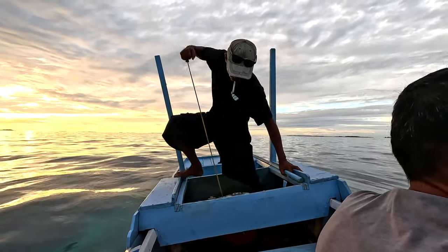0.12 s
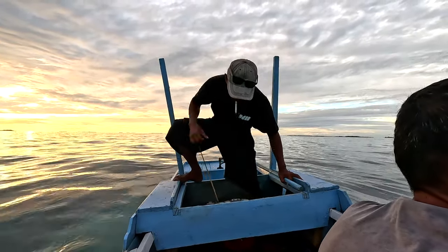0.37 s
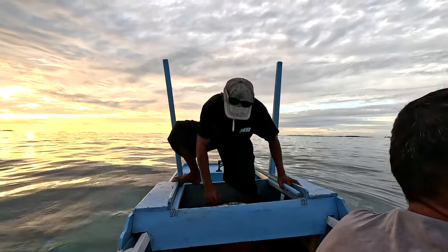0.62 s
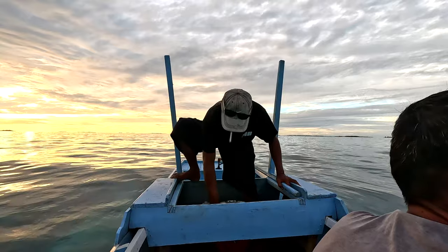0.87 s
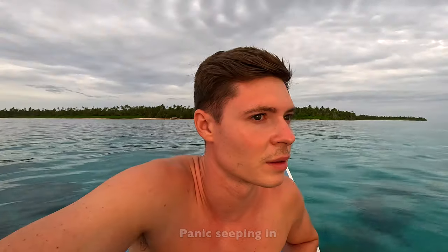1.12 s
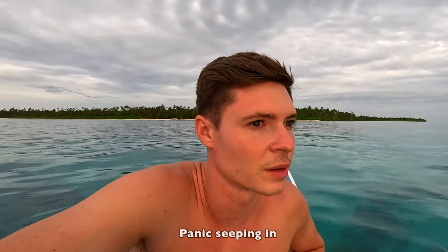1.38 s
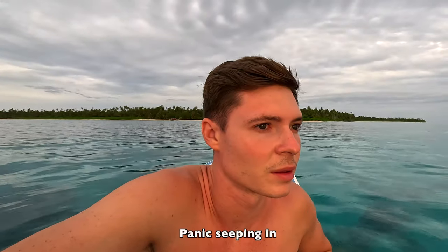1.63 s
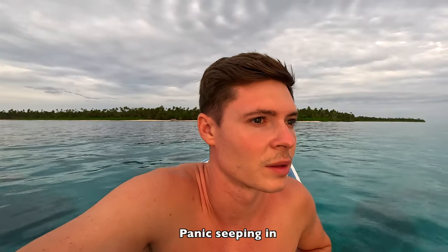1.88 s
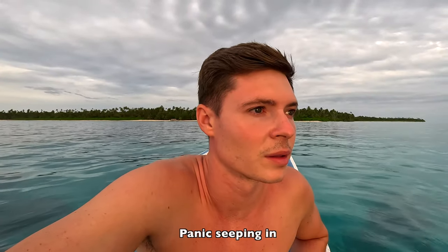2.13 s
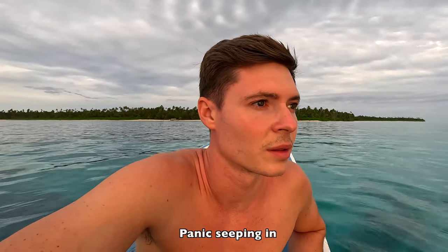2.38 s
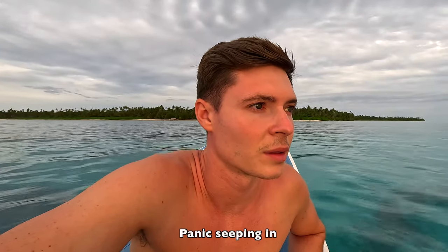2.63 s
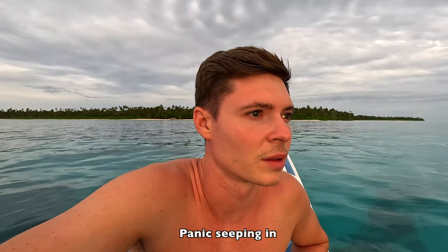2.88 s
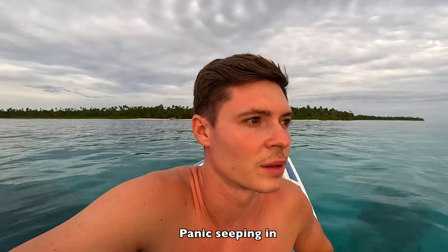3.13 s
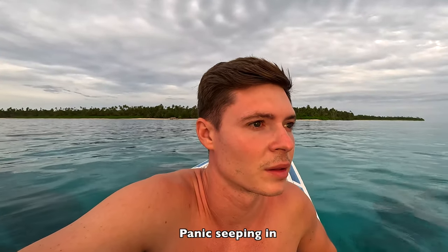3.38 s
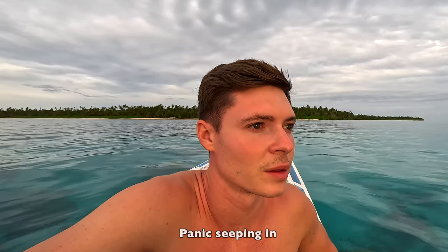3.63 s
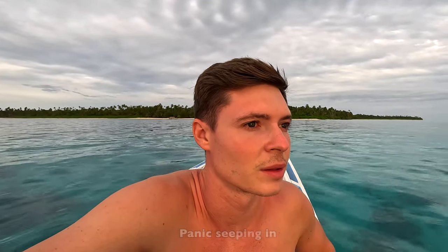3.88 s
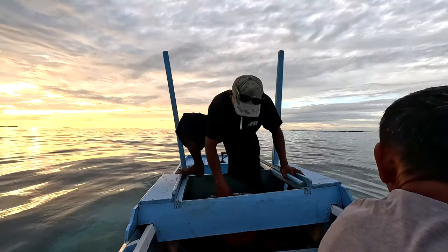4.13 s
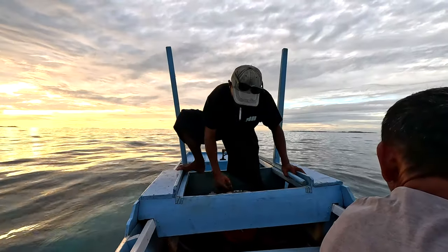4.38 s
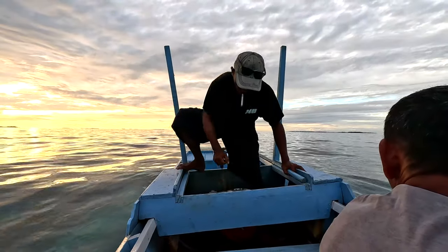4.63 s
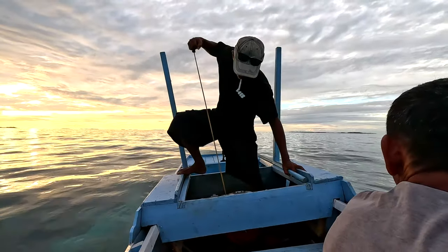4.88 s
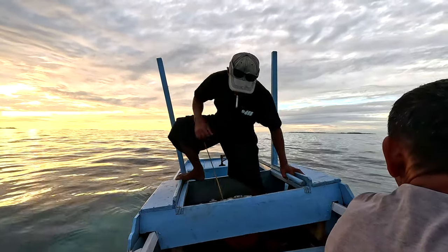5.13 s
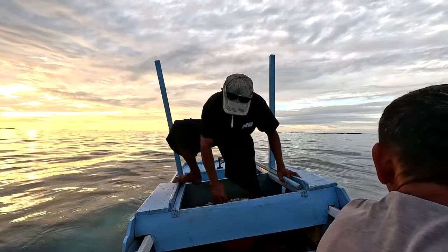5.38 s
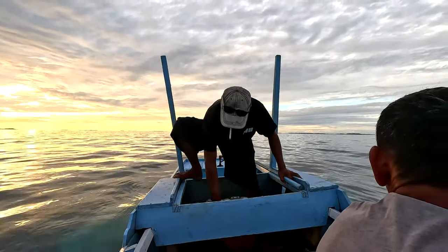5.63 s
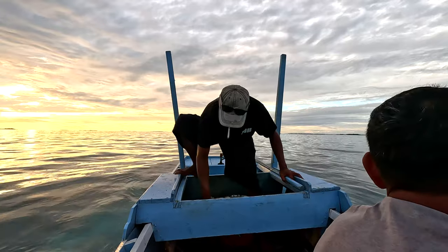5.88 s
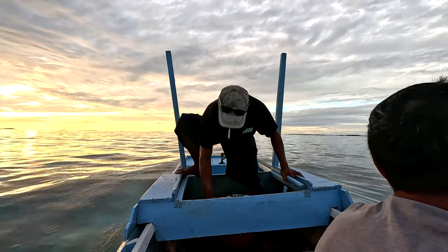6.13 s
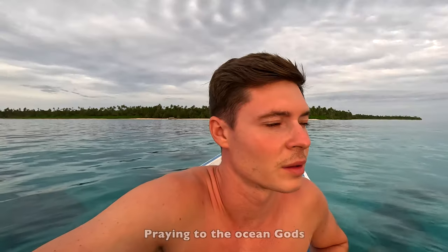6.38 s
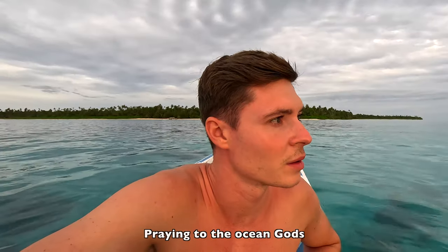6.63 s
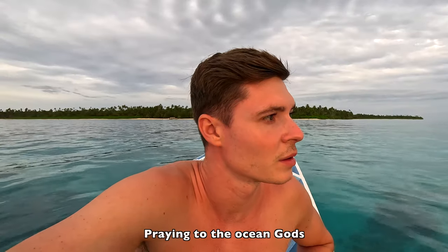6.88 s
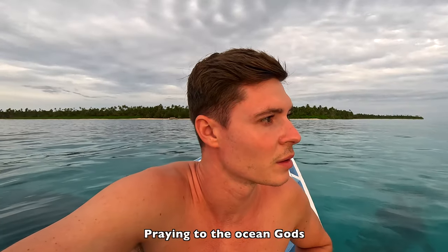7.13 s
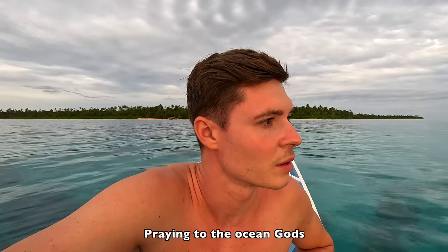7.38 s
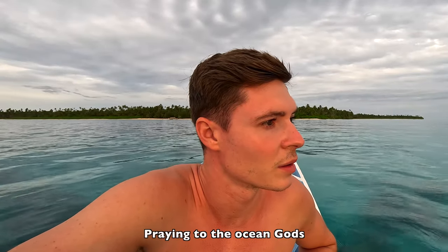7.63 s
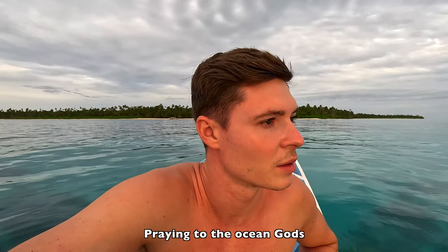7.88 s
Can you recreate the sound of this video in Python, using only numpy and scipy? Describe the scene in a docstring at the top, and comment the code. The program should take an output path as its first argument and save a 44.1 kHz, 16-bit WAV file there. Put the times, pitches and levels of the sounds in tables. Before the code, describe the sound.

Pull-cord starts on a little single-cylinder engine in a wooden boat: rattling whir, dull thumps, metal clanks, then coasting to nothing on calm water.

```python
"""In a wooden boat on calm sea, a cord pulls a small single-cylinder engine over four times; it coasts to a stop.
Rising tones and narrow noise make the starter whine; short low notes make exhaust thumps and intake pops.
Noise bursts and fading tones make metal clank and planks knock; grainy noise makes the rattle and rumble.
Shaped noise washes around the hull, with a few drips and squeaks. The sound drops to silence once, briefly."""
import sys
import numpy as np
from scipy import signal
from scipy.io import wavfile
from scipy.ndimage import uniform_filter1d

SR = 44100
rng = np.random.default_rng(int(sys.argv[2]) if len(sys.argv) > 2 else 0)


def output_pcm(signal):
    """Save a mono or channel-first signal as 16-bit PCM at the path in sys.argv[1].

    Samples are clipped to [-1, 1] before scaling.
    """
    pcm = np.clip(np.atleast_2d(signal).T, -1, 1) * 32767
    wavfile.write(sys.argv[1], SR, np.round(pcm).astype(np.int16))


def how_loud(loudness_db):
    """Turn decibels into a plain amplitude multiplier (0 dB gives 1, 20 dB gives 10)."""
    steps = np.asarray(loudness_db, float) / 20
    return 10 ** steps


N = 353241  # length in samples

# Pulls of the cord. Each row: hardest compression in seconds, effort in dB, stretch of the time before it,
# stretch of the coasting after it, exhaust pitch factor.
PULLS = [(0.233, 0, 1.0, 1.075, 1.02), (2.333, 0.5, 1.125, .97, .96), (4.956, 0, 1.0, 1.0, 1.1),
         (7.9, 0.5, 1.0, 1.0, .98)]
# Thumps and pops of one pull. Each row: seconds from the hardest compression before stretching,
# level in dB before effort, pitch in Hz before the exhaust pitch factor.
PULL_STROKES = [(-.194, -12, 158), (-.059, -12, 208), (.004, -11, 135), (0.154, -22, 205),
                (0.244, -15.5, 148)]
# Late pops as the flywheel rocks to rest. Each row: start in seconds, level in dB, pitch in Hz.
LATE_POPS = [(2.851, -30, 188), (2.929, -21.5, 205), (3.996, -28.5, 220), (5.491, -30, 197),
             (5.57, -24, 210), (5.677, -30, 262)]
# How hard the engine spins in one pull. Each row: seconds from the hardest compression before stretching,
# level in dB before effort.
SPIN_STRENGTH = [(-.42, -23), (-.36, -19.5), (-.24, -8), (-.13, -0.5), (-.03, 1), (.065, -2.5), (.09, -6.5),
                 (0.149, -2.5), (.28, -10), (.5, -15), (0.694, -20.5), (.88, -94)]
# Hands drag cord and handle. Each row: peak in seconds, length in seconds, rumble in dB, rattle in dB.
HAND_DRAGS = [(1.425, 0.22, -48.5, -51), (1.681, 0.11, -43, -45.5), (2.007, 0.084, -26, -49),
              (3.125, 0.14, -37, -49), (4.222, 0.13, -20, -34.5), (4.4, 0.28, -41.5, -50.5),
              (5.787, 0.13, -38.5, -50), (6.961, 0.072, -48, -50), (7.087, 0.13, -32, -41),
              (7.139, 0.064, -27, -39), (7.279, 0.14, -30.5, -36), (7.416, 0.11, -53, -49.5),
              (7.58, 0.3, -26, -36.5)]
# Starter whine, once a pull. Each row: when the cord runs out in seconds, level in dB, time stretch,
# pitch in Hz where the drum slips.
STARTER_WHINES = [(0.13, -29, 1, 1760), (2.245, -24.5, .8, 1290), (4.862, -28, 1, 1760),
                  (7.8, -29, 1, 1500)]
# Drum spinning up. Each row: seconds from the cord's end before stretching, pitch in Hz, relative level in dB.
DRUM_SPIN_UP = [(-.18, 420, -5), (-.152, 830, -2), (-.115, 1000, -1), (-.1, 1070, -7), (-.075, 1210, -1),
                (-.042, 1400, -4), (0, 1760, -3)]
# Cracks of valve gear, pawls and loose metal. Each row: start in seconds, level in dB, centre in Hz,
# level of the treble spit in dB.
CRACKS = [(0.0766, -17, 2150, -45.5), (0.1999, -10.5, 3430, -33.5), (0.2304, -6, 3870, -26.5),
          (0.2613, -13, 3020, -35.5), (0.2766, -8, 3250, -34.5), (0.3897, -23, 2040, -35),
          (0.568, -23.5, 2330, -76), (0.6122, -24.5, 2170, -69), (0.7306, -24, 2420, -76),
          (0.772, -20.5, 1840, -73), (0.8708, -27, 2120, -75), (0.9144, -38, 3010, -50),
          (1.1103, -35.5, 1570, -63), (1.1667, -30.5, 1840, -55), (1.225, -36.5, 3130, -77),
          (1.4104, -35, 4500, -56.5), (1.5799, -24, 3120, -56), (1.6477, -33, 1750, -56),
          (1.54, -35.5, 1440, -87), (1.8, -47.5, 4240, -75.5), (1.847, -35.5, 3240, -78),
          (1.88, -27, 1640, -85), (1.9603, -17.5, 1770, -49), (2.1714, -16, 2320, -40),
          (2.2421, -9.5, 2560, -29.5), (2.2744, -17.5, 1550, -31.5), (2.334, -11.5, 2350, -28.5),
          (2.354, -6, 3020, -25.5), (2.3751, -15.5, 2040, -28.5), (2.4168, -8.5, 3080, -32),
          (2.4791, -17.5, 4440, -34), (2.6238, -23, 2110, -44.5), (2.6673, -20, 2060, -48),
          (2.744, -26.5, 2390, -57), (2.772, -23.5, 2140, -57), (2.8314, -24.5, 2180, -51),
          (2.8476, -34, 2380, -39.5), (3.091, -33.5, 5370, -49.5), (4.008, -44, 4480, -57.5),
          (4.2235, -19, 2530, -30.5), (4.3506, -32.5, 2150, -90), (4.442, -37, 4300, -69),
          (4.525, -36, 2120, -84), (4.595, -19.5, 2330, -40.5), (4.9, -19, 4640, -47),
          (4.981, -9, 3110, -29), (5.0224, -10.5, 3540, -49), (5.108, -21.5, 4650, -42),
          (5.2613, -26, 2290, -56), (5.298, -20.5, 2300, -48), (5.3862, -26, 2280, -84),
          (5.414, -23, 2250, -70), (5.476, -28, 2110, -55), (5.492, -28.5, 5180, -48),
          (5.7104, -38, 5030, -73), (5.752, -38, 4500, -54.5), (5.946, -45.5, 2960, -78),
          (6.209, -40.5, 5420, -64), (6.4444, -46, 3500, -66), (6.995, -36.5, 2174, -58),
          (7.0401, -29, 2860, -59), (7.1286, -29.5, 2920, -57), (7.2405, -30, 2540, -53.5),
          (7.2678, -20, 2250, -61), (7.4693, -20, 1590, -53), (7.5007, -14, 3180, -47),
          (7.5752, -10.5, 3250, -28.5), (7.867, -8, 3440, -34), (7.8984, -6.5, 3930, -27),
          (7.9253, -19, 3080, -34), (7.9434, -9, 3260, -38)]
# Strikes on the starter cup. Each row: start in seconds, level in dB, tilt in dB per octave
# from 5 to 7.7 kHz (held above that).
CUP_STRIKES = [(0.202, -31, -14), (0.2318, -29, 37), (0.243, -18, -13), (0.262, -35.5, 33),
               (2.356, -32, -16.5), (2.385, -23, -15.5), (4.232, -49, -15), (4.981, -30, -19.5),
               (7.075, -45, -13), (7.868, -47, -12), (7.897, -31, 40.5), (7.908, -18, -16),
               (7.926, -37, 36)]
# Knocks on the planks. Each row: start in seconds, level in dB, centre in Hz.
PLANK_KNOCKS = [(0.102, -11, 467), (0.445, -21, 480), (1.167, -30, 578), (1.581, -18, 603),
                (1.649, -17, 670), (1.881, -19.5, 638), (1.962, -7.5, 790), (2.004, -20.5, 580),
                (2.059, -18.5, 690), (2.188, -9.5, 840), (2.964, -23, 570), (4.185, -23.5, 652),
                (4.227, -10, 680), (4.598, -13.5, 473), (4.684, -14, 440), (5.333, -21, 610),
                (5.81, -23.5, 460), (7.051, -23, 494), (7.075, -19, 670), (7.14, -17.5, 403),
                (7.242, -13.5, 587), (7.472, -12, 880), (7.5, -6.5, 400), (7.595, -14, 310),
                (7.769, -12, 484)]
# Rubbed parts sing. Each row: start in seconds, length in seconds, level in dB, pitch in Hz.
RUB_SQUEAKS = [(0.63, .08, -49, 1620), (1.852, .03, -45, 2210), (2.052, .042, -26, 672),
               (2.075, .05, -30, 1594), (2.1, .042, -24, 672), (4.728, .045, -32, 1640),
               (7.04, .044, -40, 2110), (7.3, .095, -52, 2680)]
# Drips off the hull. Each row: start in seconds, level in dB, starting pitch in Hz.
HULL_DRIPS = [(3.18, -37.5, 2820), (3.515, -36.5, 3530), (3.544, -35, 2160), (3.575, -42, 3570),
              (3.698, -26.5, 730), (3.803, -28.5, 2780), (5.996, -24.5, 2740), (6.09, -33.5, 3010),
              (6.108, -35.5, 4220), (6.165, -31, 1840)]
# Notes of starter casing, starter cup and hull planks. Each row: pitch in Hz, relative level in dB,
# time to fall 60 dB in seconds.
CASING_MODES = [(1680, -1, 0.22), (1946, -0.5, 0.089), (2110, 2, 0.15), (2530, -4, 0.23),
                (2695, -11, 0.096), (3250, -11, 0.063)]
CUP_MODES = [(2105, -16, .07), (3316, -8, .05), (3914, -11, .06), (4922, -3, .27), (4977, -4, .22),
             (7171, -18, .11), (7655, -9, .06), (9650, -35, .1), (11200, -36, .08), (12800, -45, .08),
             (14250, -52, .05)]
PLANK_MODES = [(223, -3.5, .12), (270.2, -0.5, .2), (355, -3.5, .1), (484, 0, 0.13), (563, -6.5, 0.42),
               (666.3, -2, .12), (778, 3, 0.056), (901, -4.5, 0.044)]
# Tone colour of rattle, rumble and sea. Each row: frequency in Hz, relative level in dB.
RATTLE_COLOUR = [(500, -26), (900, 0), (1350, -3), (2150, 2), (3300, -1), (4200, -8), (5040, -13),
                 (5800, -17), (7500, -25), (8600, -35), (9100, -54), (9700, -33), (11500, -37),
                 (13000, -55), (16000, -85)]
RUMBLE_COLOUR = [(24, -44.5), (40, -32.5), (199, 2), (399, -5), (495, -4), (654, 0), (728, -11), (1600, -8),
                 (2080, -33), (3520, -120)]
SEA_COLOUR = [(25, -28), (184, -2), (320, -2), (675, -7), (1040, -14.5), (2360, -23), (5340, -35),
              (7850, -48.5), (9000, -75.5), (12000, -58), (16000, -77.5)]
# Wash against the hull. Each row: time in seconds, change of level in dB.
SEA_SWELL = [(0, 1), (6.398, -4), (8.01, -2)]

INTAKE_HZ = 180  # exhaust thumps lie below this pitch, intake pops above
RUMBLE_DB, RATTLE_DB, REST_DB = -24, -27.5, -57.5
RATTLE_SLOPE = 1.213  # rattle grows faster than rumble
DRAG_RISE_DB, DRAG_FALL_DB = 29.5, 28  # lost one length before and after the peak
DAMPED_S = .13  # longest 60 dB fall of a rubbed part
PUSH_DB, PUSH_S = -8, .0028  # slug of gas in an exhaust thump: relative level, width
CASING_DB, CASING_REACH_DB = -8, 20  # relative level; loss per octave from the struck spot
CASING_LUCK_DB = 9  # random spread from blow to blow
CLATTER_S, CLATTER_LAW = 0.11, 0.97  # 60 dB fall at 2 kHz; higher parts die sooner
CLATTER_HOLD_S = 0.008  # bounce time before the fall
SCUFF_HZ = 380  # width of each smoothing pass
REACH_UP_DB, REACH_DOWN_DB = 20, 10  # loss per octave above and below the struck spot
SEA_DB = -46
MIC_LOW_HZ = 80.5
CUT_S, BACK_S, FADE_S = 4.024, 4.103, 0.035  # silence starts, fade starts, fade length


def evened(x):
    """Scales to rms 1."""
    return x / np.sqrt(np.mean(x ** 2) + 1e-20)


def add(mix, s, sound):
    """Mixes a sound in at s seconds."""
    part = mix[max(round(s * SR), 0):][:len(sound)]
    part += sound[:len(part)]


def coloured(x, points):
    """Gives x a tone colour with a filter that only looks back in time."""
    f, db = np.transpose(points)
    hz = abs(np.fft.fftfreq(4096, 1 / SR))
    gain_db = np.interp(np.log(hz + 1), np.log(f + 1), db)
    log_gain = np.log(how_loud(np.maximum(gain_db, -100)))
    taps = np.fft.ifft(np.exp(np.conj(signal.hilbert(log_gain)))).real[:2048]
    return signal.oaconvolve(x, taps)[:len(x)]


def resonate(x, hz, width):
    """Shifts pitch hz (fixed or moving) down to zero, smooths, and shifts back: a resonance of gain 1."""
    turn = np.exp(2j * np.pi * np.cumsum(hz * np.ones(len(x))) / SR)
    r = np.exp(-np.pi * width / SR)
    return 2 * (turn * signal.lfilter([1 - r], [1, -r], x / turn)).real


def narrowed(x, hz, width, passes=2):
    """Repeats one resonance to leave a narrow band around hz, at rms 1."""
    for _ in range(passes):
        x = resonate(x, hz, width)
    return evened(x)


def strokes():
    """Exhaust thumps and intake pops of every pull, timed by its wind-up and coasting."""
    events = []
    for at, effort_db, wind, coast, exhaust_factor in PULLS:
        for s, db, hz in PULL_STROKES:
            start = at + s * (wind if s < 0 else coast)
            pitch = hz * (exhaust_factor if hz < INTAKE_HZ else 1)
            events.append((start, db + effort_db, pitch))
    return events


def puff(db, hz):
    """A pocket of air swings up and dies; the higher intake note rings longer than the exhaust thump."""
    t = np.arange(SR // 10) / SR
    rise_s = np.interp(hz, [165, 190], [.007, .012])
    t60 = np.interp(hz, [165, 190], [.04, .075])
    rise = np.sin(np.pi / 2 * np.minimum(t / rise_s, 1)) ** 2
    fall = how_loud(-60 * np.maximum(t - rise_s, 0) / t60)
    push = (hz < INTAKE_HZ) * how_loud(PUSH_DB) * np.exp(-((t - rise_s) / PUSH_S) ** 2)
    return how_loud(db) * (rise * fall * np.sin(2 * np.pi * hz * t) + push)


def motion():
    """Strength of rumble and rattle in time: the powers of pulls, hand movements and the boat at rest add up."""
    t = np.arange(N) / SR
    s, spin_db = np.transpose(SPIN_STRENGTH)
    rumble, rattle = np.full(N, how_loud(REST_DB) ** 2), np.zeros(N)
    for at, effort_db, wind, coast, _ in PULLS:
        spin_s = at + s * np.where(s < 0, wind, coast)
        db = effort_db + np.interp(t, spin_s, spin_db, -99, -99)
        rumble += how_loud(RUMBLE_DB + db) ** 2
        rattle += how_loud(RATTLE_DB + RATTLE_SLOPE * db) ** 2
    for at, length, rumble_db, rattle_db in HAND_DRAGS:
        db = -np.maximum(DRAG_RISE_DB * (at - t), DRAG_FALL_DB * (t - at)) / length
        rumble += how_loud(rumble_db + db) ** 2
        rattle += how_loud(rattle_db + db) ** 2
    return np.sqrt(rumble), np.sqrt(rattle)


def jolts(per_s, spread_db):
    """Random single-sample hits of uneven strength."""
    return (rng.random(N) < per_s / SR) * how_loud(spread_db * np.minimum(rng.exponential(1, N), 4))


def gritty(per_s, spread_db, grain_s, lump_s, lump_db):
    """Noise full of uneven small contacts that die away, coming in lumps."""
    grit = signal.lfilter([1], [1, -np.exp(-1 / (grain_s * SR))], jolts(per_s, spread_db))
    span = round(lump_s * SR)
    lumps = evened(uniform_filter1d(uniform_filter1d(rng.standard_normal(N), span), span))
    return rng.standard_normal(N) * (1 + grit) * how_loud(lump_db * lumps)


def chatter(per_s, spread_db, cycles):
    """Many small loose parts, each ringing its own pitch briefly when it is jolted."""
    out = np.zeros(N)
    for hz in np.geomspace(800, 7500, num=48) * rng.uniform(.96, 1.04, size=48):
        t = np.arange(round(3 * cycles / np.sqrt(hz * 1000) * SR)) / SR
        fade = np.sin(np.pi * t / t[-1]) * np.exp(-3 * t / t[-1])
        grain = fade * np.sin(2 * np.pi * hz * t)
        grain = grain * np.sqrt(hz) / np.linalg.norm(grain)
        out += signal.oaconvolve(jolts(per_s, spread_db), grain)[:N]
    return evened(out)


def rings(x, modes):
    """The notes of an object rubbed by x, at rms 1; the contact damps the longest rings."""
    t = np.arange(SR // 2) / SR
    ring = np.zeros(len(t))
    for hz, db, t60 in modes:
        ring += how_loud(db - 60 * t / min(t60, DAMPED_S)) * np.sin(2 * np.pi * hz * t)
    return evened(signal.oaconvolve(x, ring)[:N])


def stir():
    """Gears, cord and flywheel rattle in the casing and rumble through the planks."""
    rumble_gain, rattle_gain = motion()
    shake = gritty(220, 2.8, 0.0015, .01, 2.5)
    drag = gritty(20, 0.92, 0.0032, 0.021, 2.8)
    parts = chatter(110, 2.8, 6)
    rattle = evened(coloured(evened(shake) + how_loud(-5) * parts, RATTLE_COLOUR))
    rattle += how_loud(-13) * rings(shake, CASING_MODES + CUP_MODES[:3])
    rattle += how_loud(-31) * rings(shake, CUP_MODES[3:5])
    rumble = evened(coloured(drag, RUMBLE_COLOUR)) + how_loud(-2.5) * rings(drag, PLANK_MODES)
    return rattle_gain * evened(rattle) + rumble_gain * evened(rumble)


def whine(end, level_db, stretch, slip_hz):
    """The cord spins the drum up: a rough rising whistle, returned with its start time."""
    s, hz, db = np.transpose(DRUM_SPIN_UP)
    s = s * stretch
    t = np.arange(max(s[0], -end), np.interp(slip_hz, hz, s), 1 / SR)
    pitch = np.interp(t, s, hz)
    turn = 2 * np.pi * np.cumsum(pitch) / SR
    tone = np.sqrt(2) * (np.sin(turn) + .15 * np.sin(2 * turn))
    fuzz = narrowed(rng.standard_normal(len(t)), pitch, 70)
    level = how_loud(level_db + np.interp(t, s, db)) * signal.windows.tukey(len(t), .2)
    return end + t[0], level * (.85 * tone + .45 * fuzz)


def crack(db, hz, spit_db):
    """A short clatter around its own pitch, with a spit of treble; the casing rings on."""
    t = np.arange(SR // 5) / SR
    t60 = CLATTER_S * (2000 / hz) ** CLATTER_LAW
    ring = np.zeros(len(t))
    for f, m_db, m_t60 in CASING_MODES:
        loss_db = CASING_LUCK_DB * rng.random() + CASING_REACH_DB * abs(np.log2(f / hz))
        ring += how_loud(m_db - loss_db - 60 * t / m_t60) * np.sin(2 * np.pi * (f * t + rng.random()))
    ring *= 1 - np.exp(-t / 0.0082)
    noise = rng.standard_normal(len(t))
    wide = coloured(noise, RATTLE_COLOUR)
    spit = evened(signal.sosfilt(signal.butter(3, 5500, "high", fs=SR, output="sos"), wide))
    body = evened(wide) + narrowed(noise, hz, 620)
    body = signal.sosfilt(signal.butter(3, min(1.56 * hz, 5600), fs=SR, output="sos"), body)
    fall = how_loud(-60 * np.maximum(t - CLATTER_HOLD_S, 0) / t60) * (1 - np.exp(-t / 0.00031))
    fall *= 1 + np.exp(-t / .003)  # the first contact is the hardest
    clatter = fall * (how_loud(db - 13.0) * body + how_loud(spit_db - 60 * t / 0.24) * spit)
    return clatter + how_loud(db + CASING_DB) * ring


def clang(db, tilt):
    """A sharp strike rings the cup's own notes; the tilt weakens or lifts the high ones."""
    t = np.arange(SR // 3) / SR
    ring = np.zeros(len(t))
    for hz, m_db, t60 in CUP_MODES:
        tilt_db = tilt * np.clip(np.log2(hz / 5000), 0, .62)
        ring += how_loud(db + m_db + tilt_db - 60 * t / t60) * np.sin(2 * np.pi * (hz * t + rng.random()))
    return ring * (1 - np.exp(-t / 0.00076))


def knock(db, hz):
    """A woody thud: a dull scuff, and the plank notes near the struck spot ring on."""
    t = np.arange(SR // 3) / SR
    scuff = narrowed(rng.standard_normal(len(t)), hz, SCUFF_HZ, passes=3) * how_loud(-4.5 - 60 * t / .13)
    ring = np.zeros(len(t))
    for f, m_db, t60 in PLANK_MODES:
        octaves = np.log2(f / hz)
        loss_db = REACH_UP_DB * max(octaves, 0) + REACH_DOWN_DB * max(-octaves, 0)
        ring += how_loud(m_db - loss_db - 60 * t / t60) * np.sin(2 * np.pi * (f * t + rng.random()))
    return how_loud(db - 5.0) * (1 - np.exp(-t / 0.0012)) ** 2 * (scuff + ring)


def squeak(length, db, hz):
    """A rubbed part sings a narrow, slightly unsteady note that swells and fades."""
    t = np.arange(0, length, 1 / SR)
    fuzz = narrowed(rng.standard_normal(len(t)), hz, 90)
    return how_loud(db) * signal.windows.tukey(len(t), .6) * (.5 * np.sin(2 * np.pi * hz * t) + .8 * fuzz)


def drip(db, hz):
    """A sharp steady plink, and a scratchy splash in one loose resonance that climbs as the bubble closes."""
    t = np.arange(SR // 10) / SR
    splash = .7 * narrowed(rng.standard_normal(len(t)), hz * (1 + 4 * t), .14 * hz)
    plink = 1.6 * np.sin(2 * np.pi * hz * t) * np.exp(-(t * hz / 9) ** 2)
    scratch = .2 * evened(coloured(rng.standard_normal(len(t)), RATTLE_COLOUR)) * np.exp(-t / .006)
    level = how_loud(db - 8.0 - 60 * t / 0.083) * (1 - np.exp(-t / 0.00016))
    return level * (splash + plink + scratch)


def sea():
    """Water washes as noise: random short-time spectra with drifting patches, swelling slowly."""
    frames, hz = N // 256 + 5, np.fft.rfftfreq(1024, 1 / SR)
    a, b, patches = rng.standard_normal((frames, 513, 3)).T
    patches = evened(uniform_filter1d(uniform_filter1d(patches, 10, 0), 10, 1))
    f, db = np.transpose(SEA_COLOUR)
    colour_db = np.interp(np.log(hz + 1), np.log(f + 1), db)[:, None]
    spectra = (a + 1j * b) * how_loud(colour_db + 2 * patches)
    wash = evened(signal.istft(spectra, nperseg=1024, noverlap=768)[1][:N])
    return wash * how_loud(SEA_DB + np.interp(np.arange(N) / SR, *np.transpose(SEA_SWELL)))


def scene():
    """All sources, added for one microphone."""
    mix = stir() + sea()
    for row in STARTER_WHINES:
        add(mix, *whine(*row))
    events = [(strokes() + LATE_POPS, puff), (CRACKS, crack), (PLANK_KNOCKS, knock),
              (CUP_STRIKES, clang), (HULL_DRIPS, drip), (RUB_SQUEAKS, squeak)]
    for table, sound in events:
        for s, *how in table:
            add(mix, s, sound(*how))
    return mix[None]


def top_cut(x):
    """Nothing passes above the cut-off."""
    return signal.sosfilt(signal.butter(12, 15100, fs=SR, output="sos"), x)


def record(dry):
    """The microphone drops the deep bass; the sound cuts to silence once and fades back in."""
    t = np.arange(N) / SR
    heard = signal.sosfilt(signal.butter(3, MIC_LOW_HZ, "high", fs=SR, output="sos"), dry)
    gap = np.where(t < CUT_S, 1, np.clip((t - BACK_S) / FADE_S, 0, 1))
    return top_cut(heard * gap)


dry = scene()
out = record(dry)
output_pcm(out)
```